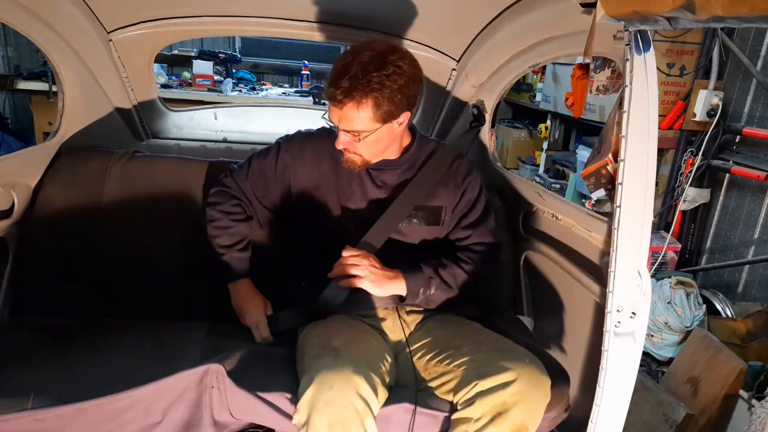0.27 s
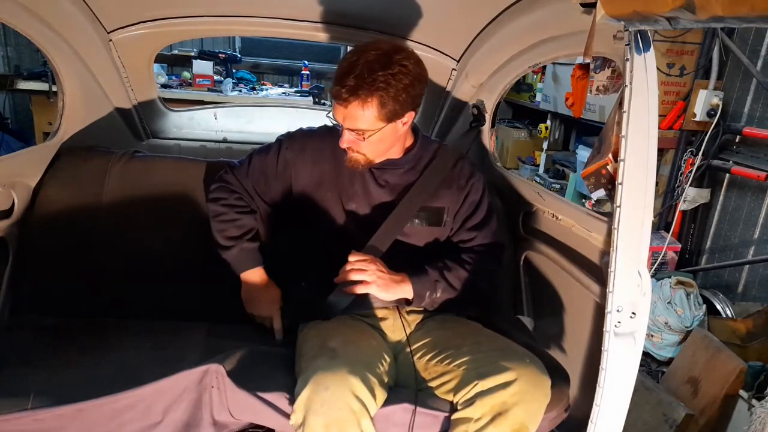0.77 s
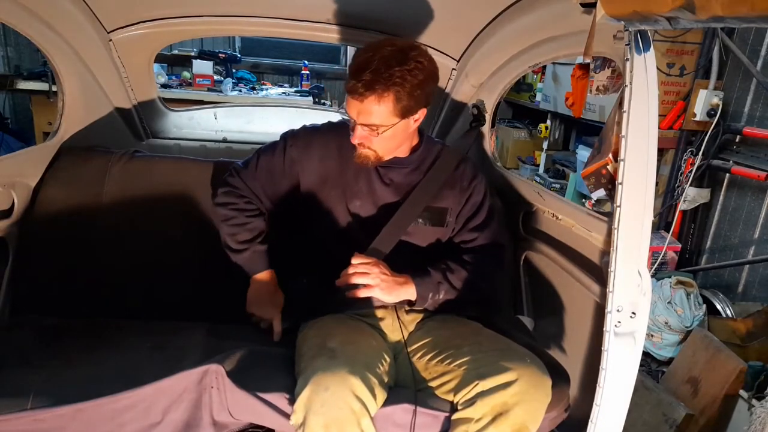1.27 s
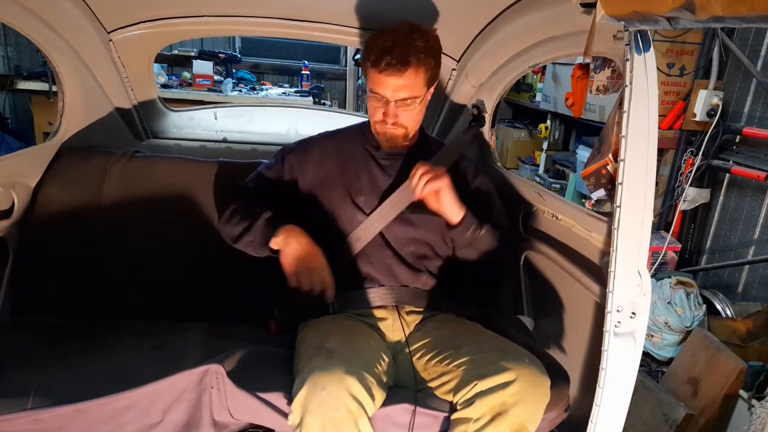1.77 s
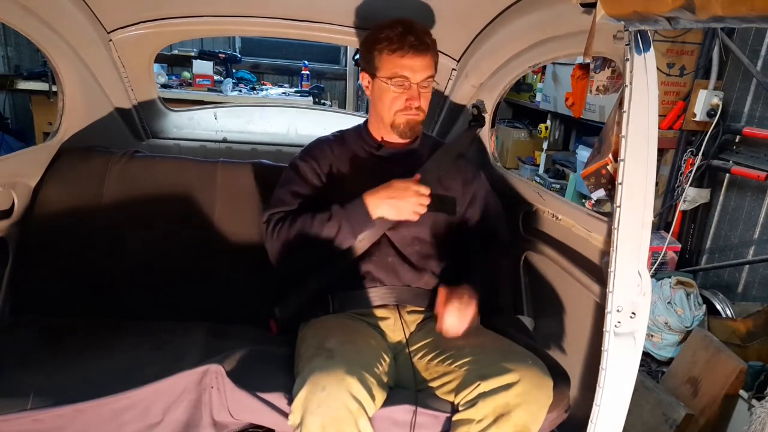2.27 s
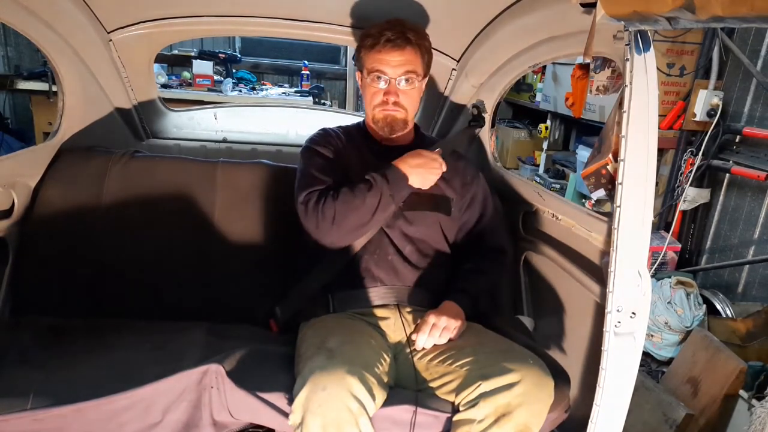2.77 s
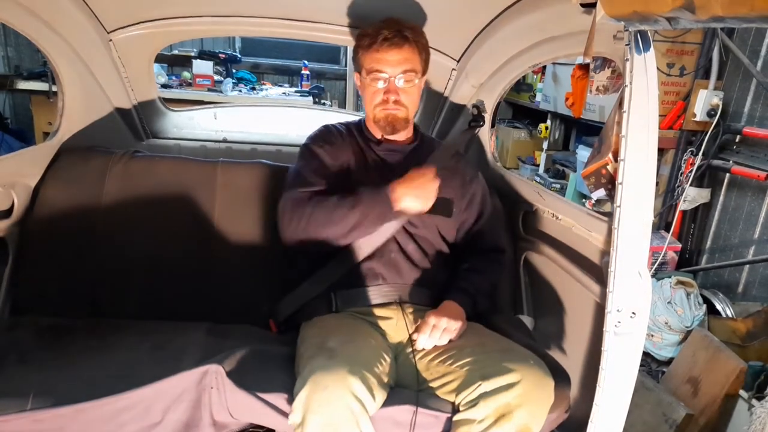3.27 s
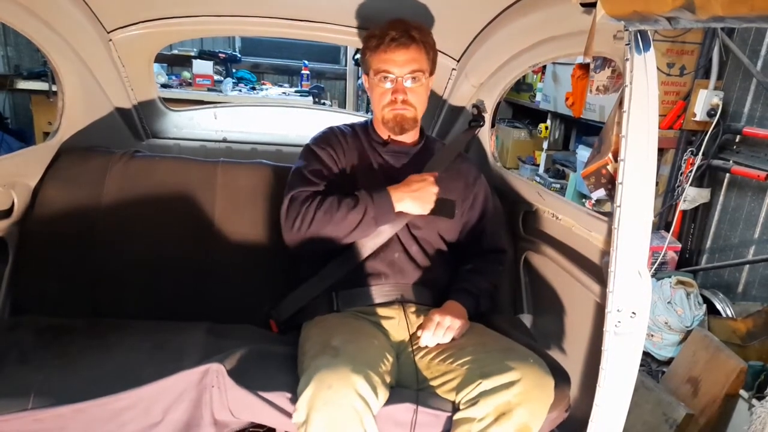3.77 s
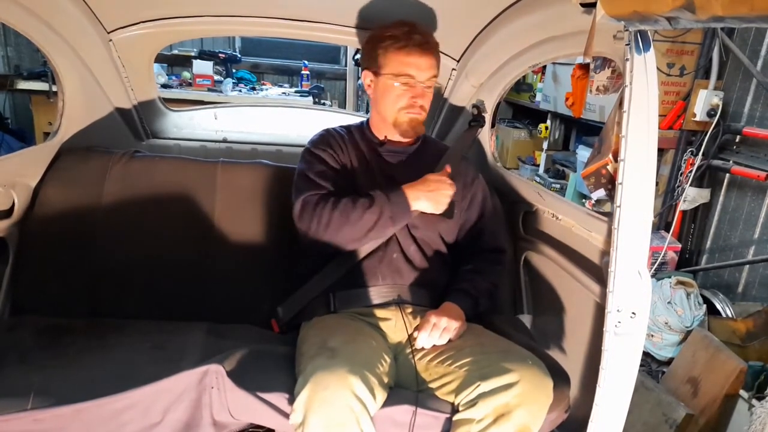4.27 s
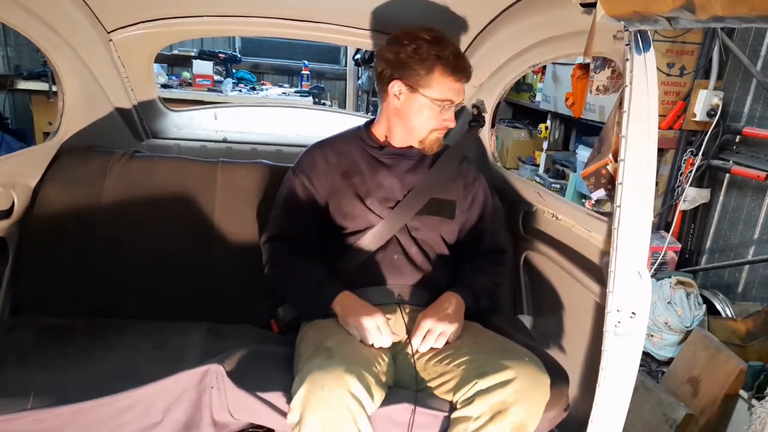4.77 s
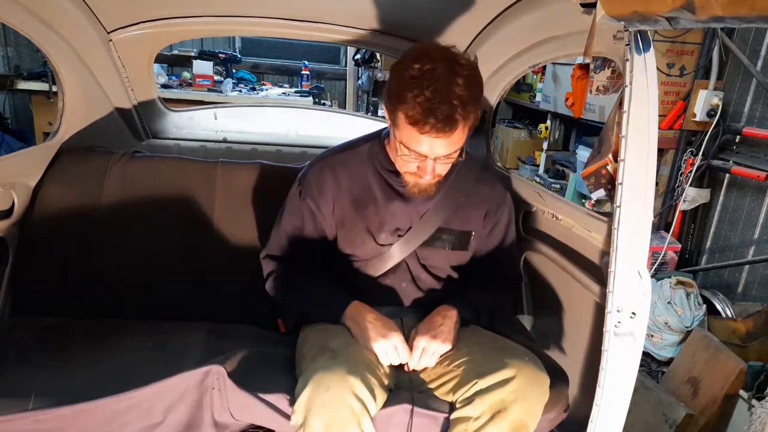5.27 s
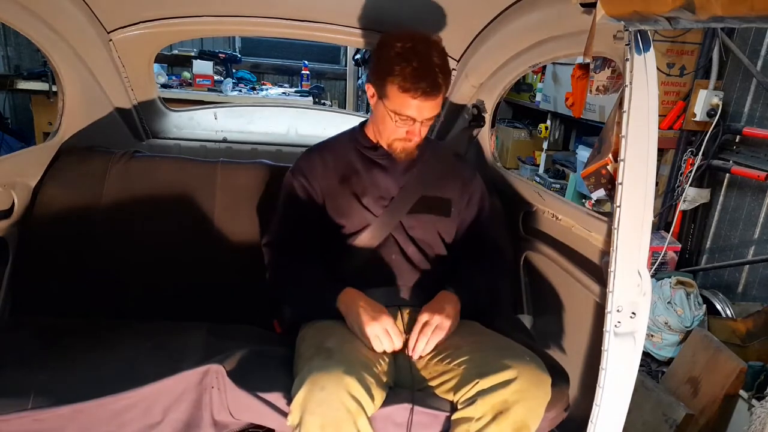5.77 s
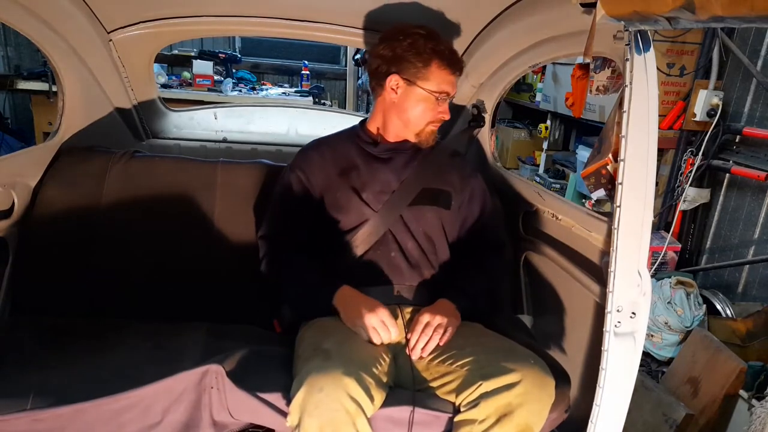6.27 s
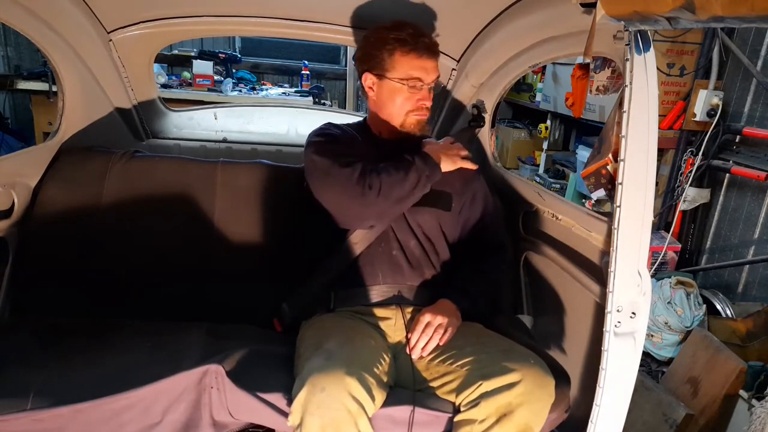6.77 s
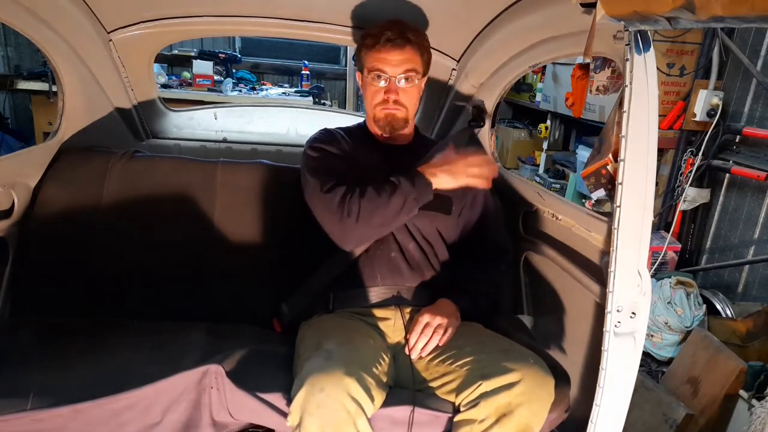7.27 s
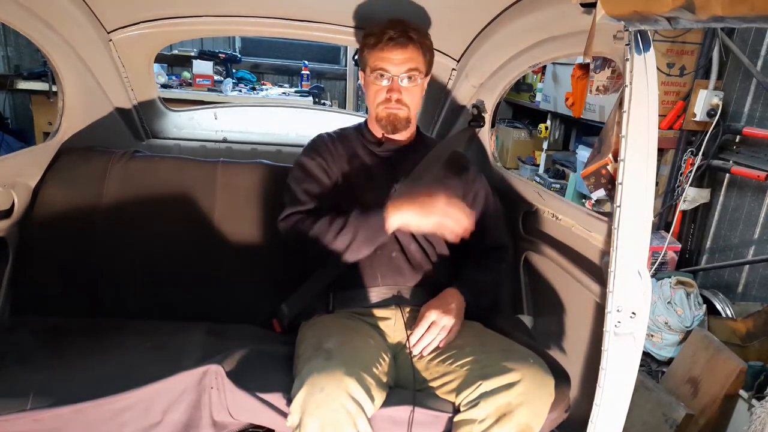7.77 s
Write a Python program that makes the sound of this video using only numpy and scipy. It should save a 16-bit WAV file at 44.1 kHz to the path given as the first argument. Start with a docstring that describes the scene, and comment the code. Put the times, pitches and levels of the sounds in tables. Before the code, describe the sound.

A quiet small car cabin, heard closely in mono over faint low steady air noise. From 0 to 1 second, fingers softly scuff and knock a hollow plastic buckle, with dull cushion bumps. At about 1.1 seconds the tongue slides in with a quick cluster of plastic clacks and a small steel ring. Clothes rasp and webbing hisses from 1.4 to 3 seconds while the seat rumbles. At 3.2, 3.6 and 4.0 seconds, sharp tugs lock the reel: loud clunks with a ringing body panel, each followed about a quarter second later by a light release tick, soft thud and short rewind hiss. From 4.4 to 7.3, gentle rubbing, a tiny high belt chirp near 4.9, faint knocks and a clearer webbing swish near 6.6. At 7.4 the belt slaps the chest, hard and dead with a brief low cabin response. Slight rustling and a tiny tick finish near 8.

```python
"""Fingers scuff and knock a plastic buckle in a small parked car; a seat-belt tongue clacks into its latch.
Three sharp tugs lock the reel with a clunk that rings a body panel; after each the pawl lets go with a tick.
Clothes rub, webbing hisses and the cushion rumbles with each movement; at last the belt slaps the chest.
Blows are noise bands (some with dying sines) that ring and fade; rubbing is grainy noise under gesture
envelopes; still air is steady coloured noise."""
import sys
import numpy as np
from scipy import signal
from scipy.fft import rfft, irfft, next_fast_len
from scipy.io import wavfile

SR = 44100
rng = np.random.default_rng(int(sys.argv[2]) if len(sys.argv) > 2 else 0)


def output_pcm(signal):
    """Save a mono or channel-first signal as 16-bit PCM at the path in sys.argv[1].

    Samples are clipped to [-1, 1] before scaling.
    """
    pcm = np.clip(np.atleast_2d(signal).T, -1, 1) * 32767
    wavfile.write(sys.argv[1], SR, np.round(pcm).astype(np.int16))


N = 353549
TIME = np.arange(N) / SR
AGE = TIME[:SR]  # the second after a blow

# reel locks: start_s, level_db, brightness_db_per_octave, crack_db, favoured_hz, lift_db
LOCKS = [(3.231, -12.5, 0.5, -11, 770, 3), (3.610, -14.5, -0.5, -20.5, 1420, 21.5),
         (3.972, -10, -1, -4, 1040, 14)]
# belt goes slack, pawl lets go: start_s, tick_db, spool_thud_db, wind_back_s
RELEASES = [(3.466, -26.5, -31.5, 0.048), (3.834, -26, -29.5, 0.052), (4.222, -28.5, -30, 0.089)]
# arm sweeps that draw the belt along: top_speed_s, rise_s, fall_s, cloth_db, webbing_db
STROKES = [(1.36, .02, 0.099, -61, -89), (1.68, 0.21, 0.15, -55.5, -57), (1.96, 0.079, 0.16, -71, -76.5),
           (2.27, 0.031, 0.08, -66, -86.5), (2.375, 0.042, 0.036, -67.5, -74.5),
           (2.53, 0.12, 0.064, -64, -70.5), (2.70, 0.13, 0.12, -65, -64.5), (2.85, 0.023, .06, -54, -76),
           (2.93, 0.08, 0.046, -60, -57), (3.16, 0.077, 0.098, -55.5, -53), (4.42, .12, .2, -68, -75.5),
           (4.89, 0.1, 0.17, -59, -64.5), (5.08, 0.055, .12, -66, -77), (5.34, 0.045, 0.13, -71.5, -67),
           (5.70, 0.23, .08, -68.5, -75), (5.834, 0.11, .08, -58, -62), (6.16, 0.12, 0.038, -66, -85),
           (6.35, 0.12, 0.063, -84.5, -93), (6.574, 0.083, 0.14, -61, -52), (6.899, 0.11, 0.098, -62, -74),
           (7.136, .08, 0.046, -61, -56.5), (7.645, 0.1, 0.064, -68.5, -64), (7.85, 0.12, 0.14, -73.5, -88)]


def from_db(db):
    """Decibels to gain."""
    return np.exp(np.asarray(db) * (np.log(10) / 20))


def rms_one(x):
    """Scale to unit power."""
    return x / np.sqrt(np.mean(x ** 2) + 1e-20)


def at_hz(points, hz):
    """Read a table on a log-frequency axis."""
    freqs, values = np.transpose(points)
    return np.interp(np.log(hz), np.log(freqs), values)


def add(track, start_s, sound):
    """Mix a sound into a track at a given time."""
    start = max(round(start_s * SR), 0)
    track[start:start + len(sound)] += sound[:N - start]


def mode(hz, t60_s, phase=0):
    """A dying sine: one resonance after a blow."""
    return np.sin(2 * np.pi * hz * AGE + phase) * from_db(-60 * AGE / t60_s)


def build_up(hz, build_cycles):
    """A resonance takes some cycles to build, so the lows rise later."""
    return 1 - np.exp(-np.minimum(AGE * hz / build_cycles, 20))


def band_bank():
    """Three seconds of noise in narrow bands, five to every two octaves: (centres in Hz, noises)."""
    edges_hz = 25 * 2 ** np.arange(0, 9.5, .4)
    noises = []
    for pair in zip(edges_hz, edges_hz[1:]):
        sos = signal.butter(2, pair, "band", fs=SR, output="sos")
        noises.append(signal.sosfilt(sos, rng.standard_normal(3 * SR)))
    centres_hz = np.sqrt(edges_hz[:-1] * edges_hz[1:])
    return centres_hz[:, None], np.array(noises)


BANDS = band_bank()


def blows(rows, colour, ring_scale, crack_s, build_cycles):
    """Each blow is a short crack and a dense ring that dies band by band; the lows build later."""
    # cabin decay, scaled by ring_scale: freq_hz, t60_s
    cabin_t60 = [(60, 0.74), (170, 0.67), (420, 0.46), (1100, 0.43), (3000, 0.34), (8000, 0.27),
                 (15000, 0.16)]
    out = np.zeros(N)
    hz, noise = BANDS
    onset = from_db(at_hz(colour, hz)) * build_up(hz, build_cycles)
    ring_shape = onset * from_db(-60 * AGE / (ring_scale * at_hz(cabin_t60, hz)))
    crack_shape = onset * np.exp(-AGE / crack_s)
    octaves = np.log2(hz[:, 0] / 1000)
    noise_starts = rng.integers(SR // 2, 2 * SR, len(rows))
    for (start_s, level_db, bright_db, crack_db, *_), start in zip(rows, noise_starts):
        tilt = from_db(bright_db * octaves)
        grain = noise[:, start:start + SR]
        ringing = np.einsum("b,bt,bt->t", tilt, ring_shape, grain)
        cracking = np.einsum("b,bt,bt->t", tilt, crack_shape, grain)
        sound = ringing + from_db(crack_db) * cracking
        first_50_ms = sound[:SR // 20]
        add(out, start_s, from_db(level_db) * sound / np.std(first_50_ms))
    return out


def drift(rate_hz):
    """Random wander of spread 1 through about rate_hz values a second."""
    knots = rng.standard_normal(4096)
    return rms_one(np.interp(TIME * rate_hz, np.arange(len(knots)), knots))


def coloured(colour, source):
    """Give a steady excitation a spectrum; unit power."""
    size = next_fast_len(N)
    hz = np.maximum(np.arange(size // 2 + 1) * SR / size, 1)
    steep_bottom = 1 / (1 + (colour[0][0] / hz) ** 2)
    spectrum = rfft(source, size) * from_db(at_hz(colour, hz)) * steep_bottom
    return rms_one(irfft(spectrum, size)[:N])


def reflections(x, spread_s, count=40):
    """Glass and trim throw back a quick crowd of echoes that comb the sound."""
    echoes = np.zeros(SR // 10)
    at = rng.integers(0, len(echoes), count)
    echoes[at] = rng.choice([-1, 1], count) * np.exp(-at / SR / spread_s)
    return rms_one(signal.oaconvolve(x, echoes)[:N])


def friction(colour, grain_db, grain_hz, patchy_db, echo_db):
    """Fibres catch and slip in tiny bursts, which gather in slower patches."""
    roughness_db = grain_db * drift(grain_hz) + patchy_db * drift(45)
    slips = rms_one(rng.standard_normal(N) * from_db(roughness_db))
    return coloured(colour, slips + from_db(echo_db) * reflections(slips, spread_s=0.05))


def gesture_speed(top_s, rise_s, fall_s):
    """Speed of one gesture: it builds to 1 at top_s and dies away."""
    roundness = 1.44  # 1 is a pointed swell, 2 a bell
    rising = (top_s - TIME) / max(rise_s, .005)
    falling = (TIME - top_s) / max(fall_s, .005)
    distance = np.maximum(rising, falling)
    near = distance < 6
    speed = np.zeros(N)
    speed[near] = np.exp(-distance[near] ** roundness)
    return speed


def gestures(rows, power=1):
    """Gain of gestures (top_s, rise_s, fall_s, level_db); where they overlap, their powers sum."""
    total = 0
    for top_s, rise_s, fall_s, level_db in rows:
        total = total + (from_db(level_db) * gesture_speed(top_s, rise_s, fall_s) ** power) ** 2
    return np.sqrt(total)


def pulls(level_db):
    """Each tug runs the webbing out, ever faster, until the lock stops it dead."""
    return [(start_s, 0.029, .008, level_db) for start_s, *_ in LOCKS]


def rewinds(level_db):
    """After each release the spring winds the belt back, faster and faster, until it is snug."""
    return [(start_s + wind_s, wind_s, 0.042, level_db) for start_s, _, _, wind_s in RELEASES]


def reel_locks():
    """The pawl bites the ratchet: the reel clatters and the panel rings, each tug favouring other modes."""
    # reel clatter spectrum: freq_hz, density_db
    lock_colour = [(35, -31), (60, -21), (120, 8.5), (230, 7), (350, -10), (800, -7), (1400, -17),
                   (1900, -25.5), (4400, -23.5), (6000, -29.5), (9800, -32), (15000, -47)]
    # reel and the panel that carries it: freq_hz, level_db, t60_s
    reel_modes = [(58.8, -16.5, 2.6), (109.4, -6, 1.04), (140.8, -7.5, 0.76), (171, -3.5, 0.66),
                  (214, 4, 0.54), (231.3, -3.5, 0.6), (322, -8, 0.58), (382, -11.5, 0.62),
                  (412.4, -8.5, 0.71), (467.4, 2.5, 0.46), (483.7, -6, 0.33), (527.5, -17, 0.93),
                  (649, -13, 0.4), (691, -6, 0.39), (708, -7, 0.47), (788, 0, 0.31), (815, -6, 0.46),
                  (850, -8, 0.15), (1060, -30.5, 0.19), (1140, -14, 0.32), (1350, -22.5, 0.28),
                  (1497, -28.5, .33), (1520, -26.5, 0.2), (3900, -17.5, 0.22), (4300, -22.5, 0.17)]
    clatter_db, panel_db, spread_db, lift_octaves = -11.5, -13.5, 2.0, 0.13
    clatter = blows(LOCKS, lock_colour, ring_scale=0.94, crack_s=0.04, build_cycles=3.55)
    out = from_db(clatter_db) * clatter
    for start_s, level_db, _, _, favoured_hz, lift_db in LOCKS:
        for hz, mode_db, t60_s in reel_modes:
            closeness = np.exp(-(np.log2(hz / favoured_hz) / lift_octaves) ** 2)
            chance_db = spread_db * rng.standard_normal()
            gain = from_db(level_db + panel_db + mode_db + lift_db * closeness + chance_db)
            ring = mode(hz, t60_s, rng.uniform(0, 2 * np.pi))
            add(out, start_s, gain * build_up(hz, build_cycles=1.9) * ring)
    return out


def belt_slap():
    """Slack runs out, the webbing hits the chest with a hard, dead smack, and the cabin answers."""
    # contacts: start_s, level_db
    contacts = [(7.4223, -39), (7.4324, -25), (7.4354, -7.5)]
    # taut webbing on a padded chest: freq_hz, level_db, t60_s
    slap_modes = [(59, -17, 0.19), (82, -12.5, 0.12), (124.7, -22, 0.54), (550, 4.5, 0.0059),
                  (880, 2.5, 0.004), (1276, -9, 0.018), (1900, -5, 0.0045), (2970, -3, 0.0019)]
    # cabin answer spectrum: freq_hz, density_db
    slap_colour = [(30, -32), (65, 1.5), (180, 3.5), (400, -4.5), (750, -11), (1200, -20), (2500, -24),
                   (5000, -33.5), (9000, -43), (15000, -48)]
    snap_db, snap_decay_s, snap_lowpass_hz, cabin_db = -23.5, 0.00099, 7000, -22.0
    smack = np.zeros(SR)
    for k, (hz, level_db, t60_s) in enumerate(slap_modes):
        sign = (-1) ** (k + 1)
        smack += sign * from_db(level_db) * mode(hz, t60_s)
    lowpass = signal.butter(2, snap_lowpass_hz, fs=SR, output="sos")
    snap = signal.sosfilt(lowpass, rng.standard_normal(SR)) * np.exp(-AGE / snap_decay_s)
    smack += from_db(snap_db) * snap
    cabin_rows = [(start_s, level_db, 0, -3.0) for start_s, level_db in contacts]
    cabin = blows(cabin_rows, slap_colour, ring_scale=0.83, crack_s=0.01, build_cycles=0.8)
    out = from_db(cabin_db) * cabin
    for start_s, level_db in contacts:
        add(out, start_s, from_db(level_db) * smack)
    return out


def buckle():
    """The tongue slides in with a plastic clack, and each contact rings the steel catch."""
    # tongue slides home, latch snaps: start_s, level_db, brightness_db_per_octave, crack_db
    latch = [(1.108, -35.5, 2, 14), (1.118, -26, 3, -12), (1.132, -26, 2, 7), (1.157, -23.5, -5, -0.5)]
    # plastic clack spectrum: freq_hz, density_db
    latch_colour = [(40, -28), (100, -1.5), (300, 0), (520, 7.5), (900, -3), (1600, -9.5), (3300, -30),
                    (5000, -43.5), (12000, -46), (16000, -56)]
    # steel catch: freq_hz, level_db, t60_s
    catch_modes = [(1680, 1, 0.16), (2100, -13, 0.16), (3180, -1.5, 0.038), (3440, -7, 0.043)]
    body_db, catch_db = -13.5, -24.0
    out = from_db(body_db) * blows(latch, latch_colour, ring_scale=0.9, crack_s=0.014, build_cycles=1.6)
    for start_s, level_db, bright_db, _ in latch:
        for hz, mode_db, t60_s in catch_modes:
            hardness_db = bright_db * np.log2(hz / 1000)
            gain = from_db(level_db + catch_db + mode_db + hardness_db)
            add(out, start_s, gain * rng.choice([-1, 1]) * mode(hz, t60_s))
    return out


def pawl_and_guide_ticks():
    """The pawl ticks as it catches and as it lets go; spool and belt guide tick lightly."""
    # spool and belt guide: start_s, level_db, brightness_db_per_octave, crack_db
    light_ticks = [(1.623, -43.5, 6, 10), (2.090, -51, -3.5, 7), (2.256, -48.5, -9, 17),
                   (2.833, -38.5, -7, -11.5), (4.511, -45.5, -5.5, 10), (5.073, -44, -10, 1),
                   (5.160, -55.5, 12, 4.5), (7.983, -38.5, -4, 17)]
    # tick spectrum: freq_hz, density_db
    tick_colour = [(100, -15), (700, 9), (1200, 4), (2200, 5.5), (3700, 10), (5500, -5.5), (9000, -2),
                   (11400, -19), (12800, -32.5), (16000, -40)]
    bite_lead_s = .013  # the pawl catches a tooth just before each lock
    bites = [(start_s - bite_lead_s, -22, -6.5, -12) for start_s, *_ in LOCKS]
    lets_go = [(start_s, tick_db, 0.2, 1.5) for start_s, tick_db, _, _ in RELEASES]
    rows = bites + lets_go + light_ticks
    return from_db(-19.5) * blows(rows, tick_colour, ring_scale=1.0, crack_s=.008, build_cycles=0.5)


def thuds_and_bumps():
    """The freed spool drops back with a soft thud; hand and buckle bump on the cushion."""
    # cushion bumps: start_s, level_db, brightness_db_per_octave, crack_db
    bumps = [(0.763, -43, -2.5, -16), (0.914, -28.5, -2, -20), (.961, -31, -1.5, -22), (1.013, -33, -2, -7),
             (1.348, -32, 2, -25), (1.489, -30.5, -4.5, 6.5), (1.618, -31.5, -6, 9),
             (3.118, -28.5, -2.5, 10), (4.815, -34.5, -8.5, 24)]
    # dull blow spectrum: freq_hz, density_db
    bump_colour = [(35, -23.5), (80, 3.5), (180, 2.5), (320, -7), (700, -7.5), (1400, -16.5), (2400, -45.5),
                   (6000, -64.5), (16000, -60)]
    thuds = [(start_s, thud_db, 0, -5.5) for start_s, _, thud_db, _ in RELEASES]
    return from_db(-12.0) * blows(thuds + bumps, bump_colour, ring_scale=1.0, crack_s=0.019, build_cycles=.6)


def plastic_knocks():
    """Plastic fittings knock hollowly: low-mid noise bands that crack and ring."""
    # knocks: start_s, level_db, brightness_db_per_octave, crack_db
    knocks = [(.282, -45.5, 7, -5), (.313, -39, 2.5, -21), (2.372, -52, 10, -6), (5.040, -38.5, -7, -4),
              (5.777, -35.5, -7, 24), (6.815, -41.5, -6.5, 7.5)]
    # hollow plastic spectrum: freq_hz, density_db
    knock_colour = [(60, -18), (180, 7), (340, 8.5), (500, 8.5), (800, 2.5), (1400, -5), (2300, -39.5),
                    (5000, -62), (16000, -72)]
    return from_db(-12.0) * blows(knocks, knock_colour, ring_scale=1.0, crack_s=0.013, build_cycles=0.61)


def guide_chirps():
    """The belt chirps through its guide: a narrow treble band that builds over several cycles."""
    # chirps: start_s, level_db, brightness_db_per_octave, crack_db
    chirps = [(1.349, -61, -7, -4), (4.885, -44, 7, 10), (4.950, -57, 2, -10)]
    # chirp spectrum: freq_hz, density_db
    chirp_colour = [(100, -41), (5500, -38), (6800, -10), (8000, 5), (9000, -17), (11000, -39)]
    return from_db(-16.5) * blows(chirps, chirp_colour, ring_scale=2.9, crack_s=.01, build_cycles=8.3)


def webbing_slide():
    """The weave hisses as it slides, rising faster than in proportion to speed."""
    # webbing spectrum: freq_hz, density_db
    webbing_colour = [(1500, -13.5), (3500, 11), (5500, 4.5), (8000, 4.5), (9800, -2.5), (11500, -13.5),
                      (12500, -18.5), (15500, -32)]
    strokes = [(top_s, rise_s, fall_s, webbing_db) for top_s, rise_s, fall_s, _, webbing_db in STROKES]
    sliding = gestures(strokes + pulls(-53) + rewinds(-54.5), power=1.7)
    hiss = friction(webbing_colour, grain_db=1.0, grain_hz=400, patchy_db=1.44, echo_db=-10.0)
    return sliding * hiss


def cloth_rub():
    """Clothes rub on belt and seat, with short rasps where the webbing slips."""
    # webbing slips: centre_s, level_db
    rasps = [(1.459, -51), (1.495, -50.5), (1.522, -49.5), (1.589, -50.5), (1.626, -49), (1.690, -53.5),
             (1.771, -58), (1.832, -57.5), (2.1, -59.5), (5.812, -67)]
    # cloth spectrum: freq_hz, density_db
    cloth_colour = [(200, -1.5), (600, 6.5), (1400, 8.5), (2200, 6.5), (3300, 4), (4100, -7), (4700, -22.5),
                    (8000, -26)]
    rasp_half_s = 0.011
    strokes = [(top_s, rise_s, fall_s, cloth_db) for top_s, rise_s, fall_s, cloth_db, _ in STROKES]
    rubbing = gestures(strokes + pulls(-52.5) + rewinds(-58.5))
    rasping = gestures([(centre_s, rasp_half_s, rasp_half_s, level_db) for centre_s, level_db in rasps])
    cloth = friction(cloth_colour, grain_db=1.5, grain_hz=480, patchy_db=2.4, echo_db=-10.5)
    return from_db(3.0) * np.hypot(rubbing, rasping) * cloth


def shell_scuffs():
    """Fingers hunt for the slot and scuff the buckle's plastic shell."""
    # scuffs: top_s, rise_s, fall_s, level_db
    scuffs = [(.02, 0.075, 0.048, -56.5), (.12, 0.037, 0.14, -63.5), (.30, 0.028, .09, -61),
              (.55, 0.26, 0.1, -64), (.93, 0.05, 0.041, -66.5), (1.03, 0.041, 0.15, -57.5)]
    # plastic shell spectrum: freq_hz, density_db
    shell_colour = [(90, 0), (190, 17), (330, 7), (500, 5.5), (1000, 2), (1500, -2), (2200, -9),
                    (2700, -20.5), (5000, -37)]
    shell = friction(shell_colour, grain_db=1.5, grain_hz=180, patchy_db=2.0, echo_db=-1.5)
    return from_db(6.0) * gestures(scuffs) * shell


def seat_rumble():
    """The cushion rumbles under shifting weight, and with each tug and rewind."""
    # weight shifts: top_s, rise_s, fall_s, level_db
    shifts = [(.02, .03, .05, -51), (.60, .03, 0.037, -55.5), (1.43, 0.11, 0.15, -44.5),
              (1.72, 0.11, 0.22, -48), (2.97, 0.11, .1, -44.5), (3.2, 0.12, .15, -39.5),
              (4.48, 0.16, 0.33, -48.5), (5.07, 0.3, 0.5, -46), (5.68, 0.34, .25, -49),
              (6.04, .03, 0.057, -54.5), (6.19, 0.039, 0.036, -54.5), (6.36, .04, 0.054, -52.5),
              (6.64, .15, 0.26, -52), (7.08, 0.062, 0.14, -55.5), (7.80, 0.19, .12, -53)]
    # cushion spectrum: freq_hz, density_db
    seat_colour = [(25, -22.5), (55, 6), (110, 5), (220, -2), (400, -9.5), (800, -15), (1400, -27),
                   (2500, -60.5)]
    weight = gestures(shifts + pulls(-35.5) + rewinds(-38.5))
    seat = friction(seat_colour, grain_db=1.0, grain_hz=170, patchy_db=0.95, echo_db=-3.5)
    return from_db(-2.0) * weight * seat


def still_air():
    """Steady, mostly low noise of the quiet cabin."""
    # air spectrum: freq_hz, density_db
    air_colour = [(15, -37), (25, -6.5), (113, 6), (169, -18.5), (215, -5), (340, -8), (804, -12.5),
                  (1170, -17), (2120, -33), (2490, -40), (2850, -35), (4380, -39), (15500, -43.5)]
    return from_db(-64) * coloured(air_colour, rng.standard_normal(N))


def scene():
    """All sources in the cabin, over still air; one channel."""
    belt = reel_locks() + belt_slap() + buckle()
    small_blows = pawl_and_guide_ticks() + thuds_and_bumps() + plastic_knocks() + guide_chirps()
    movement = webbing_slide() + cloth_rub() + shell_scuffs() + seat_rumble()
    return (belt + small_blows + movement + still_air())[None]


def record(dry):
    """A steep elliptic low-pass cuts the top."""
    cutoff_hz = 15800
    lowpass = signal.ellip(10, .1, 80, cutoff_hz, fs=SR, output="sos")
    return signal.sosfilt(lowpass, dry)


dry = scene()
out = record(dry)
output_pcm(out)
```